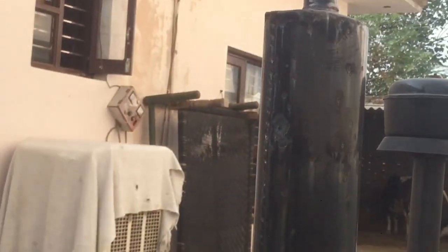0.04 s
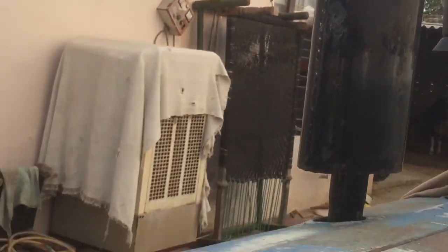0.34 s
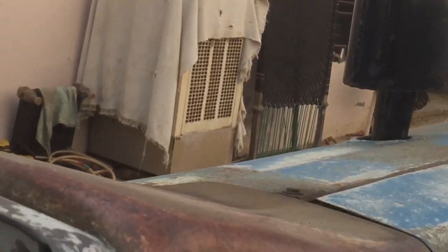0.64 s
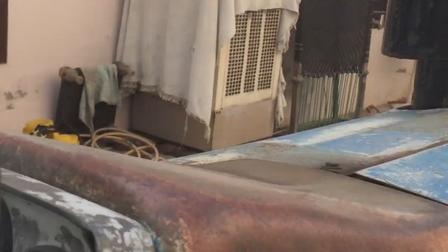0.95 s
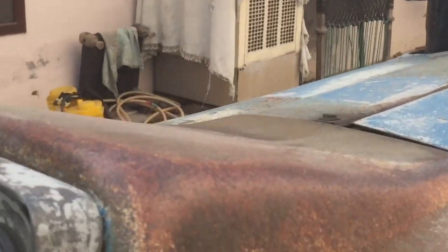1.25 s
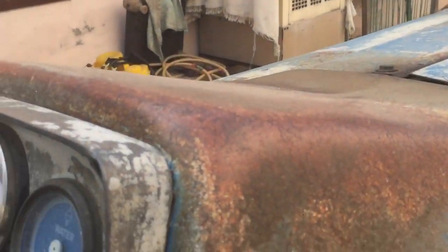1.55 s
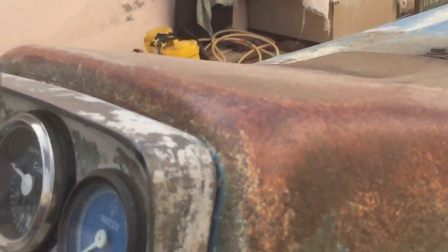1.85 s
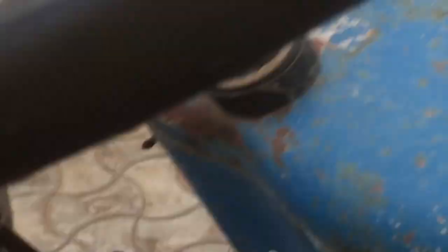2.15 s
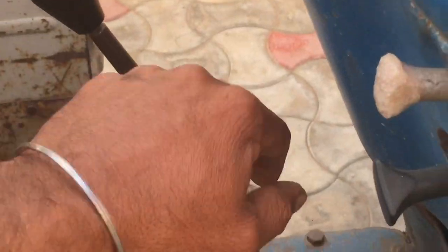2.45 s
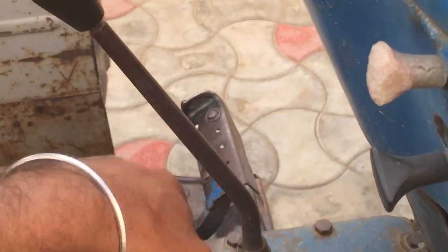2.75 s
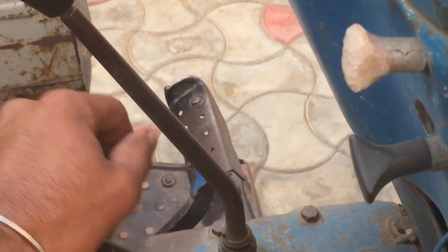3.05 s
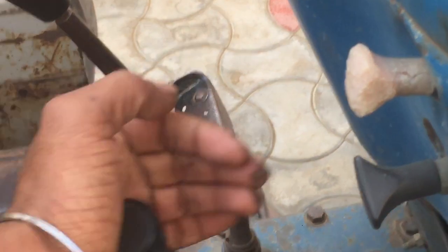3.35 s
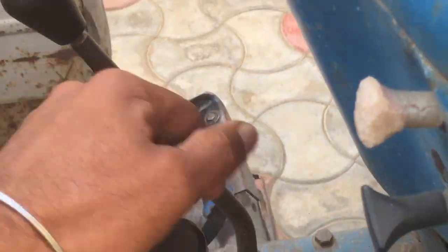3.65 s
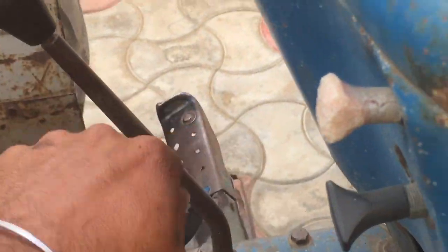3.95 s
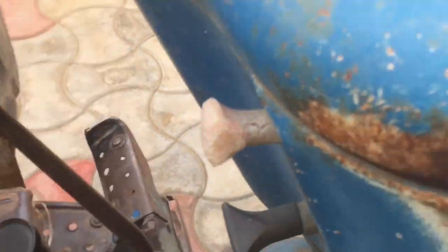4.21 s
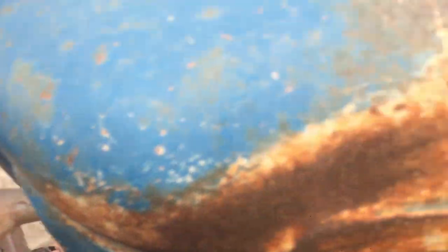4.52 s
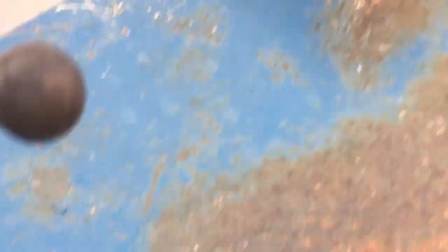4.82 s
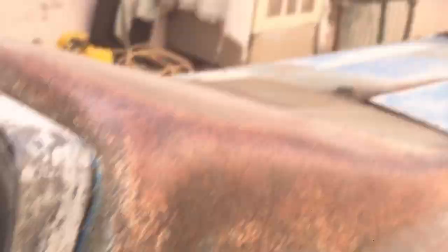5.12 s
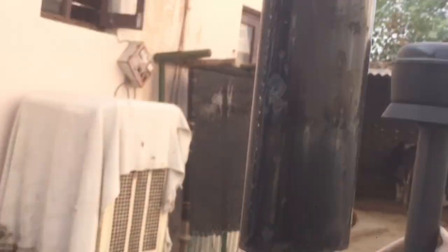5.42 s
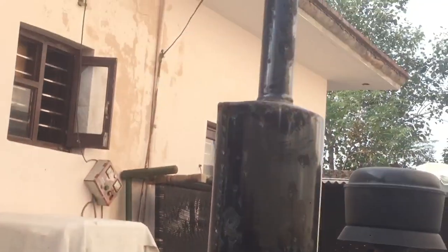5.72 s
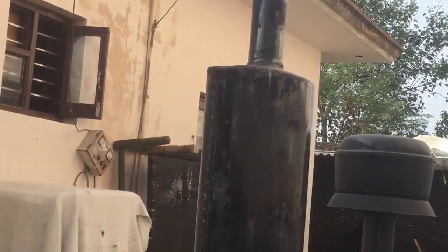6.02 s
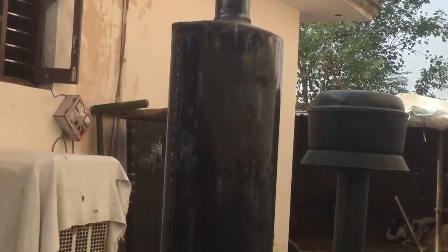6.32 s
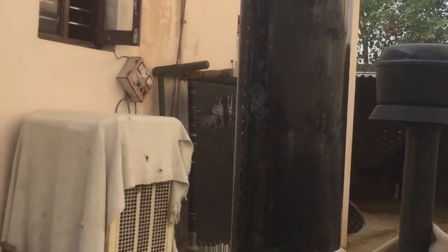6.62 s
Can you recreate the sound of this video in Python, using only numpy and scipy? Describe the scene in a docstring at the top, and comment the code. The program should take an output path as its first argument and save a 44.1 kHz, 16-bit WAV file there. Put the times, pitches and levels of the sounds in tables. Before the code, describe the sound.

Close, uneven steel clicks and small rattles come from a tractor's gear levers being shifted with the engine off, each move with a short scrape and a dull, ringing clunk. Near the end, two pedal-like clangs follow one another and the metal panels drum briefly. The knocks echo faintly around a quiet yard, with soft distant hoots and chirrs and low thumps of wind on the microphone.

```python
"""In a quiet yard, the gear levers of a parked tractor are shifted by hand, engine off. Each throw
scrapes by friction, clicks home by steel impact and excites the modes of the gearbox, which booms.
Then two sprung controls, probably pedals, snap back on their stops and shake the sheet metal.
The impacts echo faintly off the walls. Light wind puffs at the microphone, and soft hoots and
chirrs sound far off."""
import sys
import numpy as np
from scipy import signal
from scipy.fft import rfft, irfft, next_fast_len
from scipy.io import wavfile
from scipy.ndimage import uniform_filter1d

SR = 44100
rng = np.random.default_rng(int(sys.argv[2]) if len(sys.argv) > 2 else 0)


def generate_wav(sig):
    """Save sig (samples, or channels by samples) to the path in sys.argv[1] as 16-bit PCM at SR."""
    pcm = np.round(np.clip(np.atleast_2d(sig).T, -1, 1) * 32767).astype(np.int16)
    wavfile.write(sys.argv[1], SR, pcm)


N = 294147
NOW = np.arange(N) / SR  # scene time, s
T = np.arange(SR // 2) / SR  # time since a blow, s

# Levels in the tables are relative; each source adds its own gain.
# Lever impacts. Each row: start in seconds, clack, tick and sparkle levels in dB, note in Hz,
# note level in dB re the clack.
LEVER_CONTACTS = [(1.0326, -27.5, -41.5, -60, 1430, -10), (1.0625, -21, -23, -41, 1605, -4.5),
                  (1.064, -20.5, -34, -32.5, 1987, 8), (1.111, -25.5, -40, -59, 1000, -6),
                  (1.257, -28.5, -61, -68, 1907, 0.5), (1.3437, -36, -41.5, -55, 3184, -1.5),
                  (1.815, -25.5, -31.5, -48, 1686, -3), (1.825, -26.5, -28.5, -39, 3150, 2.5),
                  (1.8527, -25.5, -34.5, -30, 2540, -19), (1.8587, -16.5, -19.5, -18, 1660, -16),
                  (1.8641, -13, -30, -38, 1427, -3), (2.299, -30.5, -37, -61, 1350, -3),
                  (2.3275, -18.5, -26.5, -44.5, 1130, -3.5), (2.338, -16, -18, -30.5, 1883, 3.5),
                  (2.6899, -21, -35.5, -74, 3820, -4.5), (2.7162, -43, -67, -78, 1424, 11),
                  (2.9296, -18, -34, -49, 1530, -9), (3.1213, -47, -70, -72.5, 927, 6),
                  (3.1516, -33, -52, -63, 1387, -3), (3.4622, -30.5, -55, -57, 1520, -3),
                  (3.5185, -34, -31.5, -33, 3740, -10), (3.525, -10, -20.5, -26.5, 2766, -3),
                  (3.5416, -32, -22, -26, 1065, 9), (3.931, -40.5, -62, -69, 906, 1.5),
                  (3.9716, -46, -67, -63, 1413, 3.5), (4.3685, -33, -64, -57, 1054, 3),
                  (4.4232, -27, -60, -70, 1062, 4), (4.4334, -16.5, -32.5, -55.5, 2450, -1.5),
                  (4.4901, -13, -16.5, -24, 2005, 0.5), (4.506, -14, -32.5, -37, 1093, 6.5),
                  (4.5468, -25, -37, -52, 1092, 6), (4.7093, -33.5, -42.5, -62, 2456, 5),
                  (5.028, -35.5, -59, -67, 1640, -3), (5.3654, -37, -60, -64, 2160, -1),
                  (5.4655, -29.5, -40, -49.5, 903, 3.5), (5.632, -40, -58, -72.5, 1700, -9)]
# Gears going home. Each row: time in seconds, boom and case levels in dB, boom and case notes in Hz.
GEAR_CLUNKS = [(1.124, -38.5, -39.5, 208, 988), (1.275, -44.5, -46.5, 198, 992),
               (1.355, -50, -61, 396, 754), (1.871, -30.5, -28.5, 283.7, 837), (2.345, -35, -29, 218, 772),
               (2.714, -38.5, -41, 318, 830), (2.935, -33, -40, 312, 1476), (3.164, -48.5, -58, 183.4, 740),
               (3.544, -34.5, -32.5, 308, 752.5), (3.974, -42.5, -52.5, 356, 740),
               (4.433, -41.5, -40, 203, 953), (4.511, -35.5, -32.5, 169, 708)]
# Pedal blows and bounces. Each row: start in seconds, clang level in dB, tick level in dB.
FIRST_PEDAL_BLOWS = [(5.0559, -7, -26.5), (5.0674, -18, -18), (5.0767, -25, -18.5)]
SECOND_PEDAL_BLOWS = [(5.6531, -13.5, -27)]
# Jolts of the sheet metal. Each row: start in seconds, drumming level in dB, linkage level in dB.
PANEL_JOLTS = [(4.994, -31.5, -52.5), (5.065, -20, -44), (5.301, -38, -58.5), (5.372, -36.5, -58),
               (5.472, -29.5, -44.5), (5.656, -27, -43.5), (5.852, -43, -46.5)]
# Swishes of a sleeve. Each row: start in seconds, length in seconds, level in dB.
SLEEVE_SWISHES = [(1.188, .09, -63), (3.287, 0.21, -68.5), (4.437, 0.063, -56.5), (6.254, .13, -65)]
# Air and fingers thumping the microphone. Each row: start in seconds, level in dB, frequency in Hz.
MIC_PUFFS = [(1.274, -28, 66), (1.582, -36.5, 65.5), (1.621, -38, 65.6), (1.734, -37.5, 73),
             (2.278, -40, 88), (3.683, -29, 97), (3.752, -33, 90), (4.909, -22, 98.4), (5.532, -29, 67),
             (5.963, -33, 73.16), (6.223, -36.5, 72.6), (6.347, -24.5, 82), (6.46, -29, 78)]
# Course of the wind rumble. Each row: time in seconds, level in dB.
WIND_LEVELS = [(0.0, -99), (0.82, -72), (1.84, -55), (2.23, -63.5), (4.2, -67.5), (4.66, -55.5),
               (5.35, -52), (5.5, -61), (5.91, -52), (6.2, -56.5), (6.5, -44), (6.67, -49)]
# Distant calls. Each row: start in seconds, length in seconds, frequency in Hz, level in dB.
FAR_HOOTS = [(0.668, 0.045, 1020, -61), (0.84, 0.16, 797, -47), (0.835, 0.16, 202, -51.5),
             (0.854, 0.066, 1675, -59.5)]
FAR_CHIRRS = [(0, 0.48, 2350, -70.5), (0.844, 0.042, 1920, -54.5), (2.133, 0.19, 2165, -57.5),
              (3.41, 0.61, 3640, -70), (4.082, 0.34, 2380, -71.5)]

# Pedal modes. Each row: frequency in Hz, level in dB.
FIRST_PEDAL_MODES = [(936.7, -45), (1141, -50), (1330, -48.5), (1491, -40), (1798, -39.5), (1857, -44),
                     (2207, -45.5), (2385, -39), (2606, -35), (2799, -42.5), (3548, -49), (3682, -53),
                     (3973, -42.5), (4269, -49.5), (4355, -55)]
SECOND_PEDAL_MODES = [(1028, -51), (1157, -56.5), (1475, -60.5), (1583, -47), (1744, -47), (1960, -43),
                      (2083, -55.5), (2132, -44), (2579, -43.5), (3009, -44.5), (3289, -45.5), (3510, -46),
                      (3677, -45.5), (3736, -47.5), (3871, -44.5), (4075, -56.5)]
# Modes of the other parts. Each row: frequency in Hz, level in dB, 60 dB decay time (t60) in seconds.
LINKAGE_MODES = [(1063, -3, 0.16), (1428, 1.5, 0.077), (1610, 0, 0.067), (1788, -5, 0.12),
                 (2103, -0.5, 0.032), (2560, -6, 0.092), (2697, -8.5, 0.15), (3116, -2.5, 0.046),
                 (3500, -11, 0.044), (4060, -1, 0.056), (4800, -14, 0.048)]
STEEL_TICK_MODES = [(4630, -8.5, .07), (5380, -15, 0.2), (6080, -8.5, 0.1), (6730, 4.5, 0.051),
                    (6700, 2, 0.055), (8580, -9, 0.094)]
GEARBOX_MODES = [(565, -3.5, 0.45), (674, -7, 0.41), (749.5, -8.5, 0.48), (783, -15, 0.36), (790, 4, 0.53),
                 (858, 1.5, 0.27), (908, -10, 0.65), (973, -26.5, 0.75), (1087, -1.5, 0.33),
                 (1367, -9, 0.51), (1510, 2, 0.19)]
PANEL_MODES = [(167.4, -12, 0.14), (221.2, -8, 0.38), (240.9, 3, 0.25), (255.4, -3.5, 0.2), (284, -7, 0.14)]

# Spectra of the impacts. Each row: frequency in Hz, spectral density in dB.
CLACK_SPECTRUM = [(100, -27), (400, -11.5), (800, -2), (1300, 2), (2600, 0), (4000, -8), (6000, -17),
                  (10000, -42), (16000, -34.5)]
CRACK_SPECTRUM = [(400, -29.5), (1200, -5.5), (2500, 8.5), (4200, -12), (7000, -16.5), (16000, -50)]
TICK_SPECTRUM = [(1500, -29.5), (3500, 5), (5000, 3), (6900, -2), (7600, -6), (9400, -2.5), (10500, -13.5),
                 (16000, -30)]
SPARKLE_SPECTRUM = [(5000, -27.5), (9000, 6.5), (10400, -8.5), (11800, 8), (13200, -1), (14800, 1.5),
                    (16500, -12.5)]
BOOM_SPECTRUM = [(40, -32.5), (110, -7.5), (170, -1), (290, 1), (400, -4.5), (600, -14.5), (1500, -50)]
CASE_SPECTRUM = [(200, -8), (450, 1), (620, 3), (800, 7), (1100, -4.5), (1600, 11), (2600, -7), (5000, -34),
                 (12000, -44.5)]
CLANG_SPECTRUM = [(100, -10), (300, -13.5), (520, -21), (800, -7.5), (1100, 0.5), (1800, 5), (2700, -0.5),
                  (3900, -13.5), (5500, -14), (9000, -44), (16000, -47.5)]
# Spectra of the sustained noises. Each row: frequency in Hz, spectral density in dB.
SCRAPE_SPECTRUM = [(300, -17), (800, 4), (1500, 1.5), (2700, -2.5), (5000, -10), (9000, -20.5),
                   (12000, -30)]
SLEEVE_SPECTRUM = [(3000, 1.5), (7000, -3), (10500, -2.5), (13000, 1), (16000, -4)]
WIND_SPECTRUM = [(15, -30), (30, -13.5), (50, 1), (75, -1), (120, -8.5), (200, -27.5), (500, -63.5),
                 (2000, -78.5)]
YARD_SPECTRUM = [(15, -29.5), (30, -2.5), (66, -3.5), (130, -6), (270, -9.5), (450, -14.5), (800, -20),
                 (1900, -22), (2800, -25), (7000, -32.5), (14800, -42), (16000, -45)]
# Reverberation of the yard. Each row: frequency in Hz, t60 in seconds.
YARD_DECAY = [(150, 0.88), (1000, 0.84), (2500, 0.49), (6000, 0.42), (14000, 0.18)]


def levers(firm_db=-21, firm_rise_s=0.0006, soften_per_db=0.22):
    """Impact excitation: steel on steel ticks and rings the linkage; the spot struck sets one note."""
    out = np.zeros(N)
    for s, clack_db, tick_db, sparkle_db, note_hz, note_db in LEVER_CONTACTS:
        rise = firm_rise_s * np.exp(soften_per_db * (firm_db - clack_db))  # weaker blow, longer contact
        clack = burst(CLACK_SPECTRUM, t60=0.15, rise=rise)  # damped quickly by the hand
        clack += amp(-4) * burst(CRACK_SPECTRUM, t60=0.011, rise=rise)
        rods = amp(-4.5) * ring(LINKAGE_MODES, rise=rise, scatter_db=4, detune=0.008)
        note = amp(note_db) * ring([(note_hz, 0, 0.057)], rise=rise)
        tick = burst(TICK_SPECTRUM, t60=0.022, rise=0.00043)
        tick += amp(-7) * burst(TICK_SPECTRUM, t60=0.12, rise=0.0019)
        tick += amp(-7) * ring(STEEL_TICK_MODES, rise=0.0011, scatter_db=4, detune=0.023)
        sparkle = burst(SPARKLE_SPECTRUM, t60=0.018, rise=0.0004)
        sparkle += amp(-16) * burst(SPARKLE_SPECTRUM, t60=0.12, rise=0.001)
        body = amp(clack_db - 18) * (clack + rods + note + rattle())
        add(out, s, body + amp(tick_db - 13.5) * tick + amp(sparkle_db - 10) * sparkle)
    return out


def rattle(first_db=-14, loss_db=7, mean_gap_s=0.014):
    """Inelastic rebound: a loose joint bounces twice after a blow, losing energy each time."""
    out, at = np.zeros(len(T)), 0
    click = burst(CRACK_SPECTRUM, t60=0.01, rise=0.0003, ripple_db=11.5)
    for bounce in range(2):
        at += mean_gap_s * (0.5 + rng.random())
        add(out, at, amp(first_db - loss_db * bounce) * click)
    return out


def gearbox():
    """Structural resonance: the shift fork drives a gear home; the cast case swells and rings on."""
    out = np.zeros(N)
    for s, boom_db, case_db, boom_hz, case_hz in GEAR_CLUNKS:
        boom = burst(BOOM_SPECTRUM, t60=0.56, rise=0.0076, ripple_db=-0.5)
        boom += amp(-5) * ring([(boom_hz, 0, 0.32)], rise=0.0077)
        case = burst(CASE_SPECTRUM, t60=0.23, rise=0.0028)
        case += amp(-4) * ring(GEARBOX_MODES, rise=0.0075)
        case += amp(-9) * ring([(case_hz, 0, 0.38)], rise=0.008)
        add(out, s - 0.01, amp(boom_db - 5) * boom + amp(case_db - 5.5) * case)
    return out


def pedal(blows, modes, clang_t60, t60_at_2khz, ring_db, clang_gain_db):
    """Damped free vibration: a sprung pedal slams on its stop and clangs; higher modes die sooner."""
    out = np.zeros(N)
    damped_modes = [(hz, db, t60_at_2khz * (2000 / hz) ** 0.5) for hz, db in modes]
    for s, clang_db, tick_db in blows:
        clang = burst(CLANG_SPECTRUM, t60=clang_t60, rise=0.0007, ripple_db=7.5)
        clang += amp(ring_db) * ring(damped_modes, rise=0.00087, detune=0.0014)
        crack = amp(-3) * burst(CRACK_SPECTRUM, t60=0.0091, rise=0.00045, ripple_db=13)
        tick = burst(TICK_SPECTRUM, t60=0.06, rise=0.0013)
        tick += amp(-10.5) * burst(SPARKLE_SPECTRUM, t60=0.066, rise=0.0006)
        add(out, s - 0.0007, amp(clang_db + clang_gain_db) * (clang + crack) + amp(tick_db - 5) * tick)
    return out


def panels():
    """Plate vibration: sheet metal drums when a pedal jolts it, and the linkage rings faintly along."""
    out = np.zeros(N)
    for s, drum_db, linkage_db in PANEL_JOLTS:
        drum = amp(-4.5) * ring(PANEL_MODES, rise=0.0015)
        drum += amp(-12.5) * burst(BOOM_SPECTRUM, t60=0.32, rise=0.012, ripple_db=5.5)
        linkage = burst(CLACK_SPECTRUM, t60=0.53, rise=0.005, ripple_db=6)
        add(out, s - 0.005, amp(drum_db) * drum + amp(linkage_db - 10) * linkage)
    return out


def handling():
    """Friction noise: rods scrape, a sleeve rustles and the frame grumbles, all following the push."""
    force = push()
    grit = unit(amp(1.3 * noise([(60, -1), (200, -13), (600, -61.5)])))  # fast flutter of the level
    swishes = sum(amp(db) * swell(s, length) ** 2 for s, length, db in SLEEVE_SWISHES)
    # Each gain has a faint floor that remains between the throws.
    scrape_gain = amp(-78.5) + amp(-29.5) * force
    sleeve_gain = amp(-83) + amp(-41) * force + swishes
    frame_gain = amp(-74) * lumps(depth_db=1.5) + amp(-16) * force
    rubbing = scrape_gain * noise(SCRAPE_SPECTRUM) + sleeve_gain * noise(SLEEVE_SPECTRUM)
    return grit * rubbing + frame_gain * noise(BOOM_SPECTRUM)


def push(mount_db_per_s=189, ease_db_per_s=81):
    """Driving force: the hand's push mounts exponentially until a gear goes home, then eases off."""
    return sum(amp(db - np.maximum(mount_db_per_s * (s - NOW), ease_db_per_s * (NOW - s)))
               for s, db, *_ in GEAR_CLUNKS)


def echo(x):
    """Reverberation: house walls and the tractor's hollow body answer; treble is absorbed first."""
    hz, t, spectra = signal.stft(rng.standard_normal(len(T)), SR, nperseg=256)
    decay = amp(-60 * t / along(YARD_DECAY, hz)[:, None])
    tail = signal.istft(spectra * decay, SR, nperseg=256)[1][:len(T)]
    tail *= 1 - np.exp(-T / 0.036)
    return signal.fftconvolve(x, tail / np.linalg.norm(tail))[:N]


def wind():
    """Pressure fluctuation at the microphone: an uneven low rumble with single soft thumps."""
    times, levels_db = np.transpose(WIND_LEVELS)
    out = amp(np.interp(NOW, times, levels_db) + 4.5) * lumps(depth_db=4) * noise(WIND_SPECTRUM)
    soft_onset = 1 - np.exp(-T / 0.0025)
    for s, db, hz in MIC_PUFFS:
        thump = ring([(hz, 0, 0.055), (hz * 1.64, -4, 0.04), (hz * 1.1, -5, 0.06)], rise=0.0066)
        add(out, s - 0.002, amp(db - 4) * thump * soft_onset)
    return out


def hoots():
    """Pure tones under smooth envelopes: short, soft notes, probably from a far bird."""
    return sum(amp(db) * swell(s, length) ** 2 * np.sin(2 * np.pi * hz * NOW)
               for s, length, hz, db in FAR_HOOTS)


def yard():
    """Ambient noise: a steady broadband hush with faint narrowband chirrs."""
    out = amp(-63) * noise(YARD_SPECTRUM)
    for s, length, hz, db in FAR_CHIRRS:
        band = [(hz * 0.3, -50), (hz * 0.92, -9), (hz, 0), (hz * 1.01, -10), (hz * 2, -60)]
        out += amp(db) * swell(s, length) * noise(band)
    return out


def ring(modes, rise, scatter_db=2, detune=0):
    """Modal superposition: damped sines, new in strength at each blow; detune mimics a changing load."""
    out = np.zeros(len(T))
    for hz, db, t60 in modes:
        pitch = hz * (1 + detune * rng.normal())
        envelope = amp(db + scatter_db * rng.normal() - 60 * T / t60)
        out += envelope * np.sin(2 * np.pi * (pitch * T + rng.random()))
    return crest(out * (1 - np.exp(-T / rise)))


def burst(spectrum, t60, rise, ripple_db=4):
    """Modal overlap: crowded modes merge into noise that builds and decays (rise, t60 in seconds)."""
    envelope = amp(-60 * T / t60) * (1 - np.exp(-T / rise))
    return crest(noise(spectrum, size=len(T), ripple_db=ripple_db) * envelope)


def noise(spectrum, size=N, ripple_db=0, ripple_hz=140):
    """Spectral shaping: noise of rms 1; ripple gathers it into chance resonances about ripple_hz wide."""
    m = next_fast_len(size)
    hz = np.fft.rfftfreq(m, 1 / SR)
    knots = rng.standard_normal(1024)
    ripple = np.interp(hz / ripple_hz, np.arange(len(knots)), knots)
    gain = amp(along(spectrum, hz) + ripple_db * ripple)
    return unit(irfft(rfft(rng.standard_normal(m)) * gain, m)[:size])


def lumps(depth_db):
    """Random amplitude modulation: a gain of rms 1 that swells a few times a second."""
    return unit(amp(depth_db * noise([(6, 0), (12, -10), (30, -70)])))


def swell(s, length):
    """Half-sine envelope: one smooth rise and fall."""
    return np.sin(np.pi * np.clip((NOW - s) / length, 0, 1))


def along(points, hz):
    """Interpolation of (Hz, value) points on a logarithmic frequency axis."""
    f, v = np.transpose(points)
    return np.interp(np.log(hz + 1), np.log(f + 1), v)


def amp(db):
    """Amplitude ratio of a level in decibels."""
    return 10 ** (np.asarray(db) / 20)


def unit(x):
    """Normalisation to rms 1."""
    return x / np.sqrt(np.mean(x ** 2) + 1e-20)


def crest(x):
    """Normalisation of the loudest few milliseconds to rms 1."""
    return x / np.sqrt(uniform_filter1d(x * x, 256, mode="constant").max())


def add(track, s, sound):
    """Superposition of a sound on a track, starting at s seconds."""
    part = track[max(round(s * SR), 0):][:len(sound)]
    part += sound[:len(part)]


def scene():
    """Linear superposition: all sources sum at one microphone; levers and pedals also reverberate."""
    first_pedal = pedal(FIRST_PEDAL_BLOWS, FIRST_PEDAL_MODES,
                        clang_t60=0.19, t60_at_2khz=0.12, ring_db=0.5, clang_gain_db=-13)
    second_pedal = pedal(SECOND_PEDAL_BLOWS, SECOND_PEDAL_MODES,
                         clang_t60=0.23, t60_at_2khz=0.11, ring_db=3, clang_gain_db=-7)
    impacts = levers() + first_pedal + second_pedal
    tractor = impacts + amp(-24.5) * echo(impacts) + gearbox() + panels() + handling()
    return (tractor + hoots() + wind() + yard())[None]


def record(dry):
    """Band limiting: the microphone drops the deepest bass, and the recorder the highest treble."""
    m = next_fast_len(N + SR // 2)
    hz = np.fft.rfftfreq(m, 1 / SR)
    low_cut = amp(along([(15, -35), (25, -16), (35, -6), (48, 0)], hz))
    high_cut = hz < 16200
    return irfft(rfft(dry, m) * low_cut * high_cut, m)[..., :N]


dry = scene()
out = record(dry)
generate_wav(out)
```